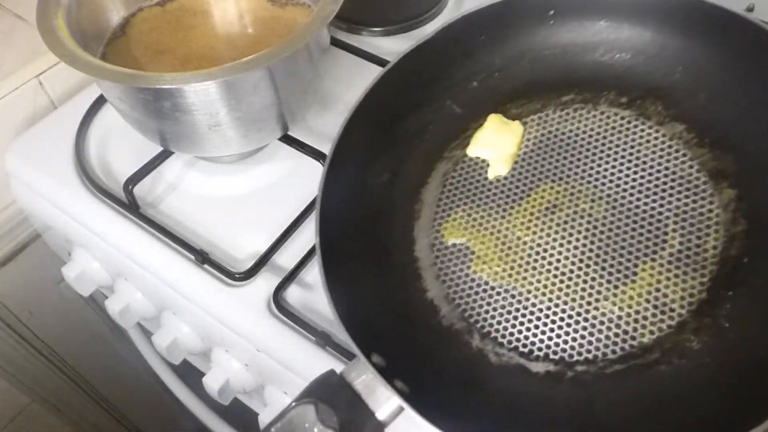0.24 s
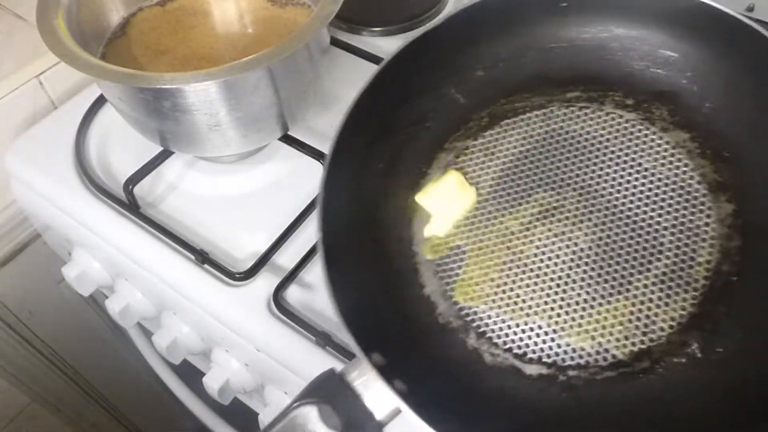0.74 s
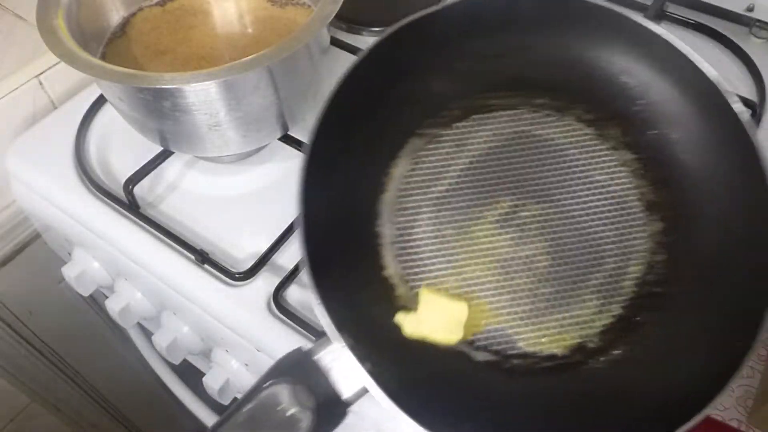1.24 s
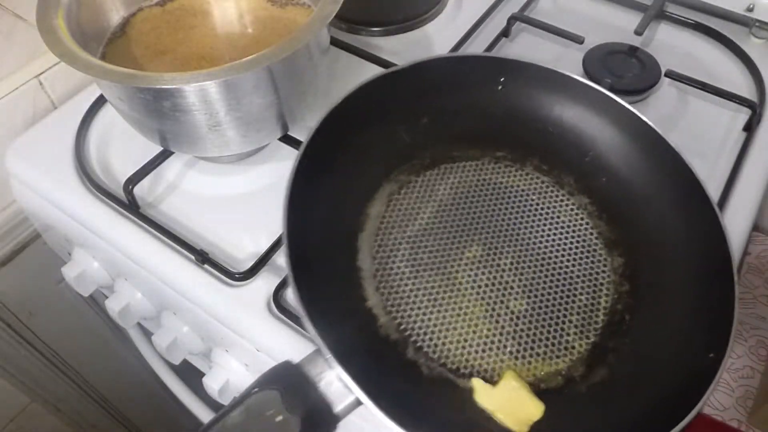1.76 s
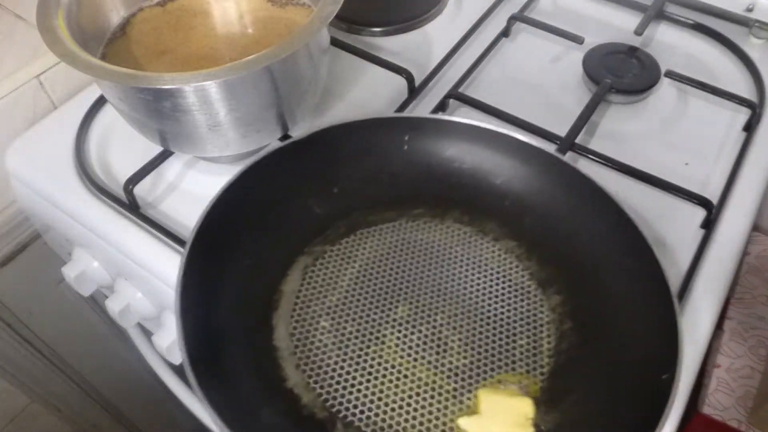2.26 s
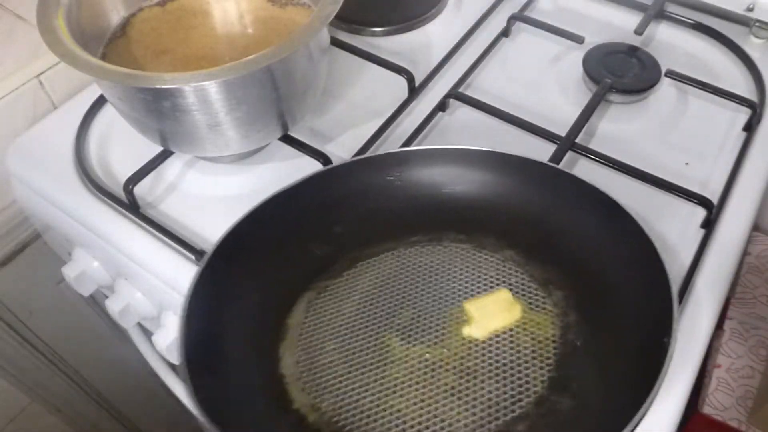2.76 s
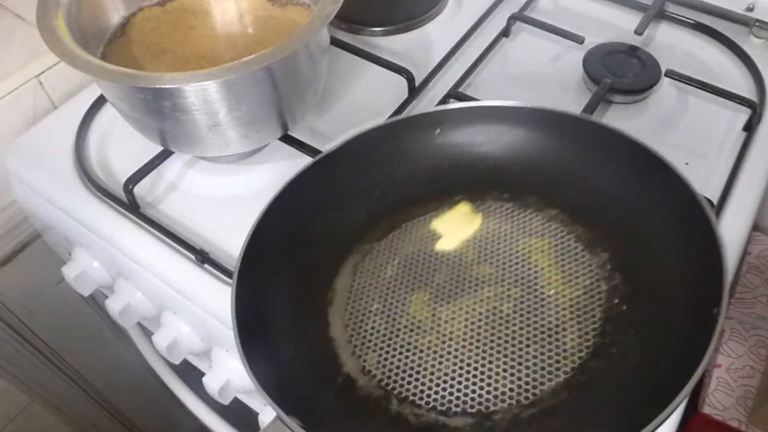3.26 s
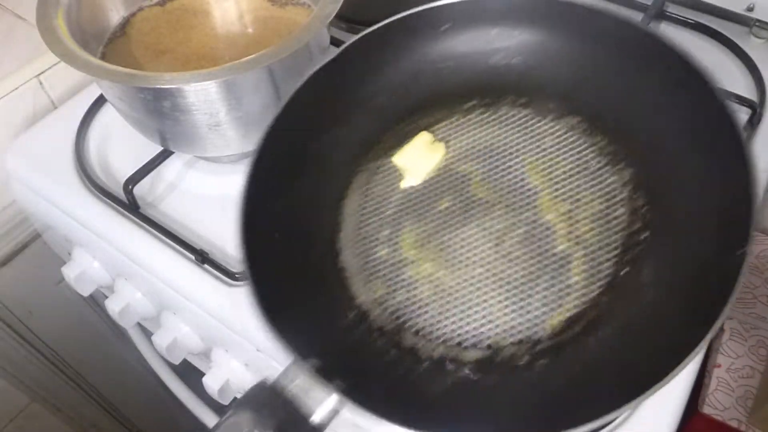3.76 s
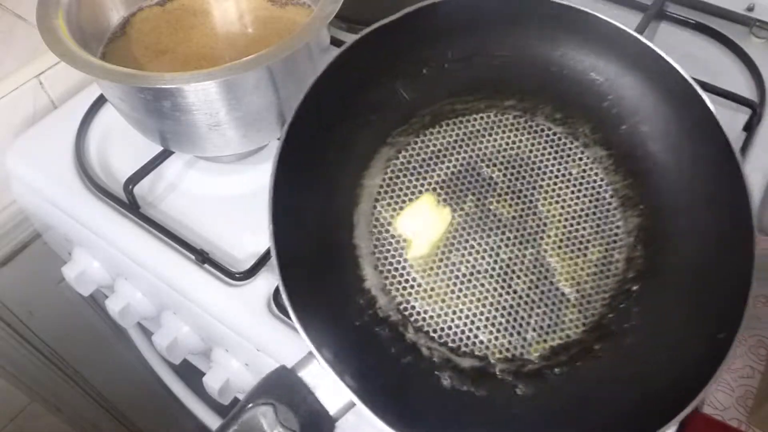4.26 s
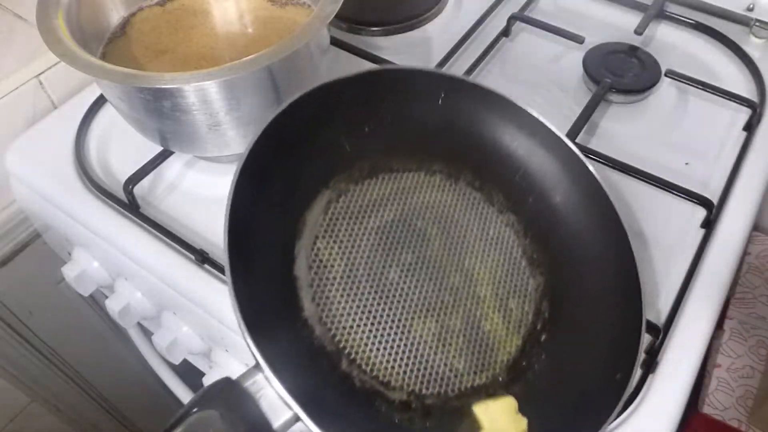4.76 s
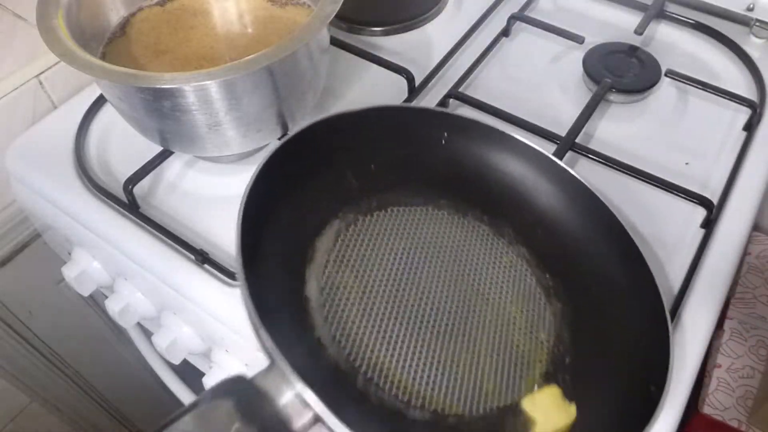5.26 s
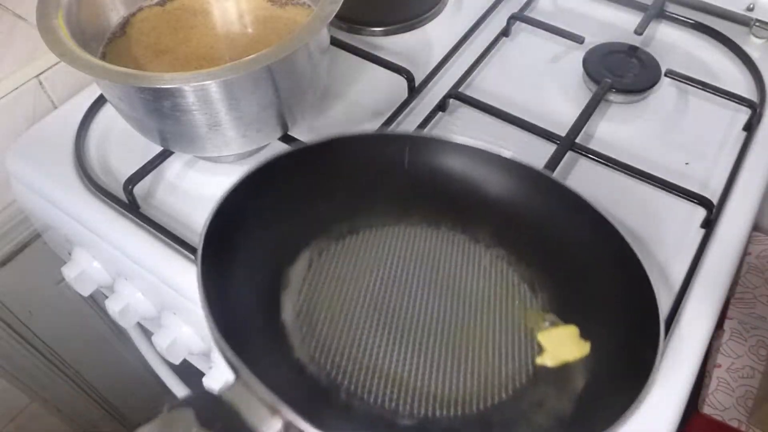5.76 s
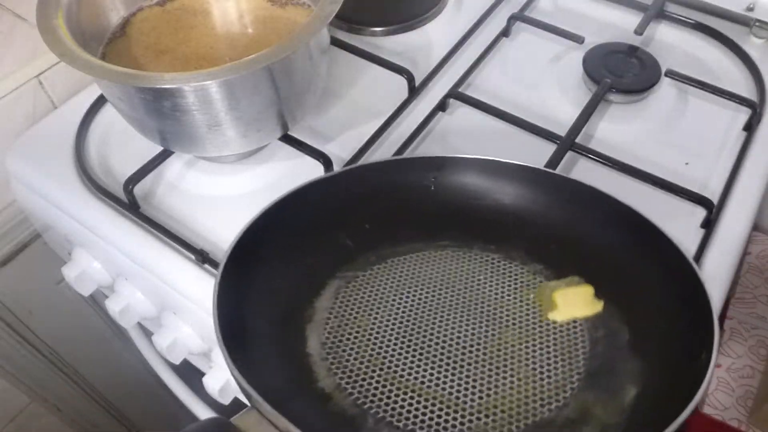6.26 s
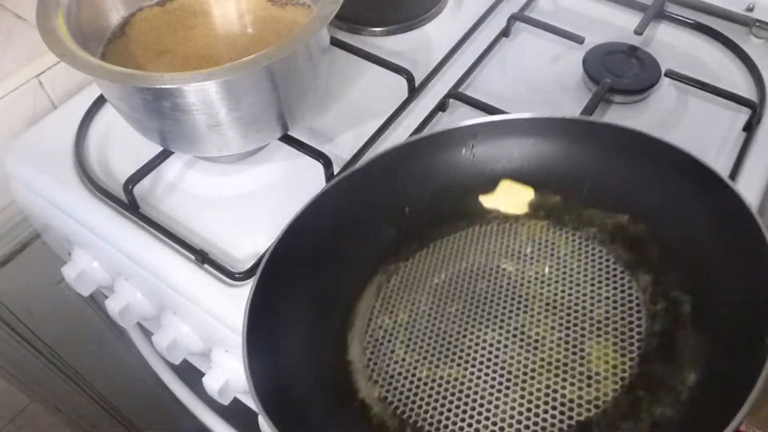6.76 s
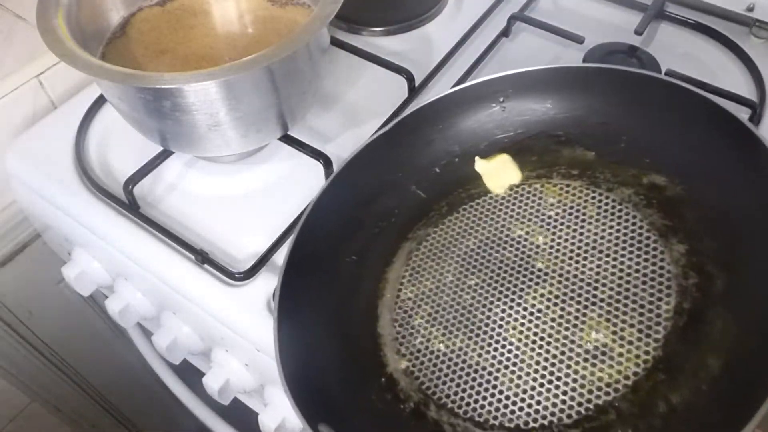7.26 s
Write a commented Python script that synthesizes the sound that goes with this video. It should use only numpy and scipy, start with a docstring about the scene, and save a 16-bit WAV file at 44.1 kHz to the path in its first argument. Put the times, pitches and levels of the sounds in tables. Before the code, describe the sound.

Butter sizzles brightly in a frying pan with sharp pops, slowly weakening, and the pan knocks once on the stove grate with a metallic ring.

```python
"""A bright sizzle with sharp pops: butter melts in a hot frying pan on a gas stove.
Steam bubbles burst in the fat, making a fine hiss, clicks and short ringing notes that fade as the
pan cools. Near 6 s the pan knocks on the iron grate, and the metal rattles and rings.
A few dull bumps and the murmur of the kitchen lie underneath. A small stereo microphone is close by."""
import sys
import numpy as np
from scipy import signal
from scipy.fft import rfft, irfft, next_fast_len
from scipy.io import wavfile
from scipy.ndimage import uniform_filter1d

SR = 44100
rng = np.random.default_rng(int(sys.argv[2]) if len(sys.argv) > 2 else 0)


def to_wav(sig):
    """Store sig (one row per channel, or 1-D mono) as 16-bit WAV at the path in sys.argv[1].

    Samples outside -1..1 are clipped; the rate is SR.
    """
    pcm = np.clip(np.atleast_2d(sig), -1, 1) * 32767
    pcm = np.round(pcm).astype(np.int16)
    wavfile.write(sys.argv[1], SR, pcm.T)  # frames by channels


N = 331191

# tone colour of the kitchen murmur: f/Hz, relative level/dB
MURMUR_COLOUR = [(20, -26), (45, -24), (82, -15), (93, -19), (110, -3), (128, -11), (155, -6.5),
                 (200, -6.5), (270, -0.5), (310, -5.5), (372, -3.5), (433, -5.5), (750, -7), (937, -13),
                 (1500, -11), (3000, -12.5), (5000, -20)]
# how alike the murmur is left and right: f/Hz, likeness (0 to 1)
MURMUR_LIKENESS = [(30, .4), (60, 1), (130, 0.85), (290, 0.92), (640, 0.34), (1400, 0), (3000, 1)]
# how long the room echoes: f/Hz, t60/s (t60 is the time to fade by 60 dB)
ROOM_DECAY = [(200, 0.19), (1000, 0.69), (4000, 0.097), (12000, 0.37)]
# dull bumps on stove and counter: t/s, level/dB, f/Hz, t60/s
DULL_BUMPS = [(0.346, -42, 262, .1), (0.391, -37, 277, 0.11), (.425, -35.5, 290, 0.06),
              (4.698, -40, 564, .05), (4.826, -35.5, 1350, 0.032), (4.826, -38, 700, 0.04),
              (4.86, -45, 767, .2), (5.005, -26.5, 370, 0.034), (5.005, -34.5, 573, 0.094),
              (5.007, -29, 900, 0.026), (5.036, -37.5, 1120, 0.068), (5.039, -41, 390, 0.09)]
# the pan hits the grate and bounces a little: t/s, base level/dB
PAN_KNOCKS = [(5.972, -21.5), (5.9783, -42)]
# rattle of the stove's sheet metal: f/Hz, relative level/dB, t60/s
STOVE_RATTLE = [(100, -40, .3), (160, -12, 1), (350, -19.5, 0.94), (700, -6, 0.27), (1330, -14, 0.36),
                (2500, -6, 0.18), (4360, -16, 0.28), (5600, -5, 0.15), (10000, -10, 0.084),
                (15000, -13, 0.036)]
# ringing notes of pan and grate: f/Hz, level relative to the knock/dB, t60/s
PAN_NOTES = [(189.5, -15.5, 0.7), (249, -27.5, 1.9), (332, -17.5, 0.27), (498, -13.5, .3), (640, -27, .2),
             (700, -16, 0.15), (736, -11, 0.13), (754, -0.5, 0.2), (800, -12, 0.14), (868, -13, 0.51),
             (993, -25.5, 3.14), (1066, -8, 0.22), (1118, -1, 0.13), (1328, -7.5, 0.3), (1386, -15, 0.4),
             (1500, -19, 0.18), (1600, -30, 0.33), (1865, -11, 0.26), (1850, -17, .11), (2320, -11.5, 0.34),
             (2400, -22, 0.29), (2600, -13, 0.2), (3270, -10.5, 0.11), (4850, -13, 0.32), (5420, -9, 0.2),
             (6000, -3, 0.1), (6050, -5, 0.12), (6140, -7.5, 0.26), (7960, -10, 0.105), (7700, -6.5, 0.075),
             (8240, 2.5, 0.073), (10600, -8.5, 0.17)]
# steam escaping from under the butter: t/s, length/s, f/Hz, bandwidth/Hz, level/dB
STEAM_JETS = [(.0, 0.089, 6400, 900, -42), (0.183, 0.034, 6400, 500, -34), (0.342, 0.15, 6000, 700, -37),
              (0.881, .11, 4300, 400, -37.5), (1.392, 0.056, 2500, 300, -43),
              (1.372, 0.066, 6200, 500, -40), (1.445, .06, 6750, 812, -33), (1.655, 0.03, 5400, 400, -37),
              (2.527, .025, 3550, 300, -38.5), (4.414, 0.1, 3440, 300, -46), (4.457, 0.037, 5400, 350, -36)]
# water spitting in the fat: t/s, peak level between 1 and 5.5 kHz/dB
WATER_SPITS = [(0.2807, -19), (0.5243, -21), (0.9078, -24), (0.9896, -21), (1.046, -23), (1.2371, -17),
               (1.3623, -20), (1.9168, -20), (1.9348, -21), (1.9854, -21), (2.0238, -25), (2.0358, -21),
               (2.3396, -18), (2.5138, -24), (3.3657, -24), (3.3842, -22), (4.0183, -25), (4.033, -23),
               (4.048, -19), (4.1224, -31), (4.453, -25), (4.4636, -25), (5.1104, -23), (5.4031, -23),
               (5.4134, -26), (5.6101, -29), (5.8005, -28), (5.8681, -26), (6.4677, -28), (6.6672, -24),
               (7.2659, -27), (7.4165, -25), (7.4515, -27)]
# the loudest bursting bubbles: t/s, level/dB, f/Hz
LOUD_POPS = [(0.0149, -14.5, 6740), (0.0444, -14, 6130), (0.1391, -20, 8130), (0.1564, -14.5, 9000),
             (0.2804, -13.5, 8650), (0.3484, -15, 5910), (0.399, -13, 6150), (0.4693, -18, 9050),
             (0.6394, -19, 9250), (0.6654, -15, 9400), (0.8749, -14, 9750), (0.9887, -15, 10300),
             (1.3404, -22, 10300), (1.5988, -19, 10000), (1.8224, -16, 6680), (1.9844, -19, 9100),
             (2.4498, -18, 8650), (2.517, -13, 9300), (2.8724, -28, 10300), (3.057, -17, 6900),
             (3.3834, -22, 8710), (3.4416, -14.5, 6940), (3.6341, -18.5, 9900), (3.7584, -19, 9540),
             (3.8651, -15.5, 8400), (3.8824, -18, 9100), (4.0284, -16, 8700), (4.123, -18, 9490),
             (4.1724, -16.5, 7500), (4.3054, -22, 9800), (4.3745, -18, 10200), (4.4633, -14, 5340),
             (4.5506, -20, 9470), (4.6399, -16, 8830), (4.9202, -22, 9330), (5.0434, -19, 9340),
             (5.112, -15, 8830), (5.2014, -18, 9900), (5.3173, -22, 10100), (5.4148, -14.5, 9800),
             (5.8681, -21.5, 6560), (6.2851, -20, 9310), (6.3729, -21, 9450), (6.4674, -29, 9560),
             (6.57, -25, 9290), (6.6662, -25, 10300), (6.7704, -26, 9040), (6.9985, -24, 9250),
             (7.1631, -24, 8490), (7.2674, -27, 9240), (7.4106, -26, 9340)]
# course of the sizzle: t/s, level/dB, then boost/dB for the largest, large and middle bubbles
SIZZLE_COURSE = [(0.0, -30.5, 0.5, 0, 3.5), (0.12, -33.5, 0.5, -1.6, 2), (0.5, -31.5, 1, -1.3, 0),
                 (0.85, -30, -4, -2.4, -2), (1.0, -29, -3, -1, 0), (1.45, -29.5, -2, 0, 0.5),
                 (1.9, -31.5, 1.5, 0.36, 1), (2.3, -32.5, 1, 0.17, -0.5), (2.9, -33.5, 1.5, 0, -1),
                 (3.8, -35, 0, -1, -1), (4.3, -35.5, -0.5, -1.6, 0), (4.5, -38, 0, 2, -0.5),
                 (4.85, -35.5, 2, -0.78, -0.5), (5.5, -37.5, 1, 0.55, 0), (5.85, -36.5, 2.5, 1, 0),
                 (6.2, -38.5, 2.5, 0.2, -0.5), (6.8, -39, 2.5, 1.3, -0.5), (7.35, -40, 1, 0.39, -1),
                 (7.51, -37, 3.5, 0.55, -1)]
# where the largest, large, middle and fine bubbles sound: f/Hz
BUBBLE_SIZE_HZ = [2310, 4170, 6400, 10000]
# tone colour that pan bowl and microphone give the sizzle: f/Hz, relative level/dB
SIZZLE_COLOUR = [(410, -62), (700, -12.5), (922, -17.5), (1010, -16.5), (1120, -16.5), (1640, -13.5),
                 (1750, -14.5), (4050, -5.5), (5120, -5.5), (6830, -2.5), (8100, -4), (9730, 0.5),
                 (11800, -8), (14800, -12), (16000, -17.5)]
# the microphone's two sides: f/Hz, left minus right level/dB, phase lead of the left/rad
MIC_SIDES = [(100, 1.3, 0), (640, 2.5, -.4), (1200, 1, -.8), (2100, -.3, -.2), (3300, -.8, -.1),
             (8400, -1.6, -.1), (10500, -2, .3), (13600, .8, -.3)]

MURMUR_DB, WAVER_DB, RUMBLE_WAVER_DB = -50.5, 0.9, 2.2  # the rumble near 75 Hz wavers extra
SCUFF_DB, SCUFF_T60_S, SCUFF_RISE_S = -13.5, 0.11, 0.008  # level relative to the bump
FLURRY_DB, FLURRY_RISE_S, FLURRY_FALL_S = -19.5, 0.0051, 0.016  # level relative to the pop
SPUTTER_DB, SPUTTER_PER_DB = 0.45, 0.0973  # the sizzle gets more uneven as it weakens
TREBLE_LIMIT_HZ = 15750


def gain_of(db):
    """Turns decibels into a factor to multiply by."""
    return 10 ** (np.asarray(db) / 20)


def unit_rms(x):
    """Scales a signal so that its average strength (rms) is 1."""
    return x / np.sqrt(np.mean(x ** 2) + 1e-20)


def look_up(table, hz, column=1):
    """Reads a table between its rows, on a logarithmic frequency scale."""
    columns = np.transpose(table)
    return np.interp(np.log(hz + 1), np.log(columns[0] + 1), columns[column])


def add(mix, s, sound):
    """Adds a sound to the mix, starting at s seconds."""
    part = mix[..., round(s * SR):][..., :sound.shape[-1]]
    part += sound[..., :part.shape[-1]]


def bandpass(x, low_hz, high_hz, order=2):
    """Keeps the sound between two frequencies."""
    return signal.sosfilt(signal.butter(order, [low_hz, high_hz], "bandpass", fs=SR, output="sos"), x)


def ring(hz, t60, rise_s, glide=0.):
    """A fading vibration with a soft start; glide raises the pitch as it dies."""
    t = np.arange(int(t60 * SR) + 8) / SR
    envelope = (1 - np.exp(-t / rise_s)) * gain_of(-60 * t / t60)
    return envelope * np.sin(2 * np.pi * hz * t * (1 + glide * t / t60))


def drift(samples):
    """A random curve, smoothed over this many samples."""
    return unit_rms(uniform_filter1d(uniform_filter1d(rng.standard_normal(N), samples), samples))


def patches(noise, bands, frames):
    """Blurs a frequency-by-time grid of noise into soft patches."""
    return unit_rms(uniform_filter1d(uniform_filter1d(noise, bands, axis=0), frames, axis=1))


def fade_bands(x, table):
    """Splits x into frequency bands; each fades at the t60 in the table's last column."""
    hz, t, spectrum = signal.stft(x, SR, nperseg=512)
    return hz, spectrum * gain_of(-60 * t / look_up(table, hz, column=-1)[:, None])


def kitchen_murmur():
    """Soft, low noise that wavers slowly and is only partly alike in the two ears."""
    frames, hz = N // 1024 + 5, np.fft.rfftfreq(4096, 1 / SR)
    noise = rng.standard_normal((frames, len(hz), 5)).T
    left, unrelated = noise[0] + 1j * noise[1], noise[2] + 1j * noise[3]
    alike = look_up(MURMUR_LIKENESS, hz)[:, None]
    spectrum = np.array([left, alike * left + np.sqrt(1 - alike ** 2) * unrelated])
    waver, rumble = (unit_rms(uniform_filter1d(v, 12)) for v in rng.standard_normal((frames, 2)).T)
    colour_db = look_up(MURMUR_COLOUR, hz)[:, None] + 1.64 * patches(noise[4], bands=8, frames=5)
    rumble_db = (abs(hz - 75) < 28)[:, None] * RUMBLE_WAVER_DB * rumble
    spectrum *= gain_of(colour_db + rumble_db + WAVER_DB * waver)
    murmur = signal.istft(spectrum, nperseg=4096, noverlap=3072)[1][:, :N]
    return gain_of(MURMUR_DB) * unit_rms(murmur)


def room_echo(x):
    """The walls send back many small, fading echoes; the bass reaches both sides alike."""
    echoes = np.zeros((2, SR // 3))
    slots = np.arange(80, SR // 3 - 20, 20)
    arrivals = slots + rng.integers(0, 20, (2, len(slots)))
    np.put_along_axis(echoes, arrivals, rng.choice([-1., 1.], arrivals.shape), 1)
    hz, (left, unrelated) = fade_bands(echoes, ROOM_DECAY)
    alike = (1 / (1 + (hz / 500) ** 2))[:, None]
    right = alike * left + np.sqrt(1 - alike ** 2) * unrelated
    tail = signal.istft([left, right], SR, nperseg=512)[1]
    return signal.oaconvolve(x[None], tail / np.linalg.norm(tail[0]), axes=1)[:, :N]


def bumps():
    """Each bump is a short, dull note; it drags a little, adding a scuff of noise near its pitch."""
    out = np.zeros(N)
    t = np.arange(SR // 8) / SR
    for s, db, hz, t60 in DULL_BUMPS:
        add(out, s, gain_of(db) * ring(hz, t60, rise_s=0.0019))
        scuff = unit_rms(bandpass(rng.standard_normal(len(t)), 0.82 * hz, 1.5 * hz, order=1))
        envelope = gain_of(-60 * t / SCUFF_T60_S) * (1 - np.exp(-t / SCUFF_RISE_S))
        add(out, s, gain_of(db + SCUFF_DB) * envelope * scuff)
    return out


def pan_knock():
    """Metal hits metal with a crack, and the sheet metal of the stove rattles."""
    out = np.zeros((2, N))
    for s, db in PAN_KNOCKS:
        shared, *each_side = rng.standard_normal((3, SR // 2))
        hz, spectrum = fade_bands(shared + 0.19 * np.array(each_side), STOVE_RATTLE)
        spectrum *= gain_of(look_up(STOVE_RATTLE, hz))[:, None]
        rattle = signal.istft(spectrum, SR, nperseg=512)[1]
        crack = ring(hz=6100, t60=0.0047, rise_s=0.00005)
        add(out, s, gain_of(db + 12.5) * rattle)
        add(out, s, gain_of(db + 10) * crack)
    return out


def pan_ring():
    """Pan and grate ring on after the knock; the high notes flutter as the pan rattles."""
    out = np.zeros(N)
    for s, db in PAN_KNOCKS:
        for hz, note_db, t60 in PAN_NOTES:
            rise_s = 0.0001 + (22 / hz) ** 2  # low notes build up slowly through the stove
            note = ring(hz, t60, rise_s)
            flutter = unit_rms(uniform_filter1d(rng.standard_normal(SR * 4), 300))[:len(note)]
            depth = 0.27 * min(hz / 2500, 1)
            add(out, s, gain_of(db + note_db) * note * (1 + depth * flutter))
    return out


def steam_jets():
    """Steam escapes from under the lump of butter in short, whistling hisses."""
    out = np.zeros(N)
    settle = 1000  # samples for the filter to settle
    for s, length_s, hz, width_hz, db in STEAM_JETS:
        noise = rng.standard_normal(int(length_s * SR) + settle)
        jet = bandpass(noise, hz - width_hz / 2, hz + width_hz / 2)[settle:]
        add(out, s, gain_of(db) * unit_rms(jet) * np.hanning(len(jet)))
    return out


def spits():
    """Water spits in the hot fat, one sharp click each time."""
    out = np.zeros(N)
    click = np.diff(ring(hz=2560, t60=0.00057, rise_s=0.00004, glide=0.27), prepend=0)
    click /= abs(bandpass(click, 1000, 5500)).max()
    for s, db in WATER_SPITS:
        add(out, s, gain_of(db) * click)
    return out


def pops():
    """Single bubbles ring loudly for an instant as they burst."""
    out = np.zeros(N)
    for s, db, hz in LOUD_POPS:
        add(out, s, gain_of(db) * ring(hz, t60=0.008, rise_s=0.00063, glide=0.02))
    return out


def bubble_swarm(per_s, cycles, spread_db, flurry_db, width_db, sizes):
    """Bubbles burst at random, a few strongly; each size has its own pitch and left-right place."""
    strength = gain_of(spread_db * np.minimum(rng.exponential(1, N), 3.5) + flurry_db * drift(500))
    strength *= rng.random(N) < per_s / SR
    which_size = rng.integers(0, sizes, N)
    out = np.zeros((2, N))
    for size, hz in enumerate(np.geomspace(1200, 12500, sizes)):
        bubble = ring(hz, t60=cycles / hz, rise_s=0.43 / hz, glide=0.26)
        bubble *= np.sqrt(hz) / np.linalg.norm(bubble)  # equal energy per Hz
        side_db = width_db * rng.standard_normal()
        left_right = gain_of([[side_db / 2], [-side_db / 2]])
        out += left_right * np.convolve(strength * (which_size == size), bubble)[:N]
    return unit_rms(out)


def sizzle_level_db(t):
    """The sizzle fades as the pan cools, flares up around each loud pop and sputters at random."""
    slow_db = np.interp(t, *np.transpose(SIZZLE_COURSE)[:2])
    pop_s, pop_db, _ = np.transpose(LOUD_POPS)[:, :, None]
    flurries = np.exp(-abs(t - pop_s) / np.where(t < pop_s, FLURRY_RISE_S, FLURRY_FALL_S))
    power = gain_of(slow_db) ** 2 + (gain_of(pop_db + FLURRY_DB) ** 2 * flurries).sum(0)
    sputter = np.interp(t, np.arange(N) / SR, drift(500))
    depth_db = SPUTTER_DB + SPUTTER_PER_DB * (slow_db.max() - slow_db)
    return 10 * np.log10(power) + depth_db * sputter


def bubble_boost_db(hz, t):
    """As the mix of bubble sizes changes, each size lifts or lowers its own pitch range."""
    times, _, *boosts = np.transpose(SIZZLE_COURSE)
    size_db = [np.interp(t, times, db) for db in boosts] + [0 * t]  # fine bubbles get no boost
    shares = [look_up(np.c_[BUBBLE_SIZE_HZ, row], hz) for row in np.eye(len(BUBBLE_SIZE_HZ))]
    return np.transpose(shares) @ np.array(size_db)


def sizzle():
    """Countless steam bubbles burst in the fat: hiss, clicks and tiny notes, coloured by the pan."""
    shared, *each_side = rng.standard_normal((3, N))
    hiss = (shared + 0.17 * np.array(each_side)) * gain_of(0.75 * drift(120))
    clicks = bubble_swarm(per_s=1000, cycles=2.47, spread_db=4, flurry_db=2, width_db=-0.5, sizes=8)
    notes = bubble_swarm(per_s=1200, cycles=20.3, spread_db=2.5, flurry_db=0.9, width_db=0.5, sizes=20)
    mix = gain_of(-2) * hiss + gain_of(-8) * clicks + gain_of(-10.5) * notes
    hz, t, spectrum = signal.stft(mix, SR, nperseg=256)
    flatten = uniform_filter1d(np.mean(abs(spectrum) ** 2, (0, 2)), 5) ** -0.5
    spectrum *= (flatten * gain_of(look_up(SIZZLE_COLOUR, hz)))[:, None]
    groups = patches(rng.standard_normal(spectrum.shape[1:]), bands=4, frames=12)
    spectrum *= gain_of(0.84 * groups)  # groups of similar bubbles come and go
    treble = signal.istft(spectrum[0] * (hz > 5000)[:, None], SR, nperseg=256)[1]
    spectrum /= treble.std()  # the level refers to the part above 5 kHz
    level_db = sizzle_level_db(t)
    flicker_db = level_db - uniform_filter1d(level_db, 100)
    steadiness = np.clip((hz - 10500) / 4000, 0, 0.7)[:, None]  # the finest fizz flickers least
    spectrum *= gain_of(bubble_boost_db(hz, t) + level_db - steadiness * flicker_db)
    return signal.istft(spectrum, SR, nperseg=256)[1][:, :N]


def scene():
    """The frying pan in front, the kitchen all around."""
    frying = sizzle() + pops() + spits() + steam_jets()
    bass_cut = signal.butter(4, 130, "highpass", fs=SR, output="sos")
    hits = signal.sosfilt(bass_cut, pan_knock() + bumps())  # the hits carry no deep bass
    to_walls = gain_of(-8.5) * frying.mean(0) + gain_of(-7) * hits.mean(0)
    return frying + hits + pan_ring() + room_echo(to_walls) + kitchen_murmur()


def record(dry):
    """The microphone's two sides differ in level and phase, and the highest treble is cut off."""
    size = next_fast_len(N + 4096)
    hz = np.fft.rfftfreq(size, 1 / SR)
    left_gain = gain_of(look_up(MIC_SIDES, hz) / 2) * np.exp(0.5j * look_up(MIC_SIDES, hz, column=2))
    stereo = irfft(rfft(dry, size) * np.array([left_gain, 1 / left_gain]), size)[:, :N]
    treble_cut = signal.firwin(511, TREBLE_LIMIT_HZ, window=("kaiser", 9), fs=SR)
    return signal.oaconvolve(stereo, treble_cut[None], "same")


dry = scene()
out = record(dry)
to_wav(out)
```